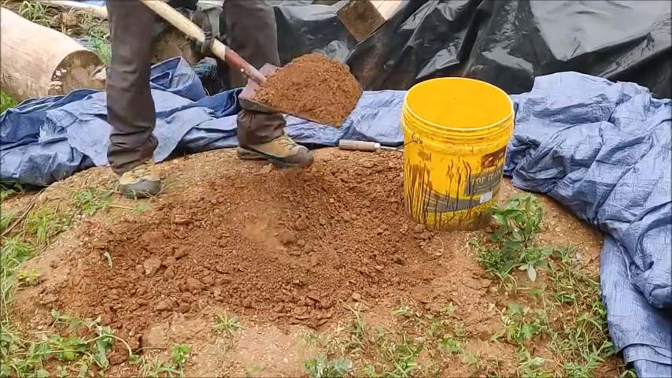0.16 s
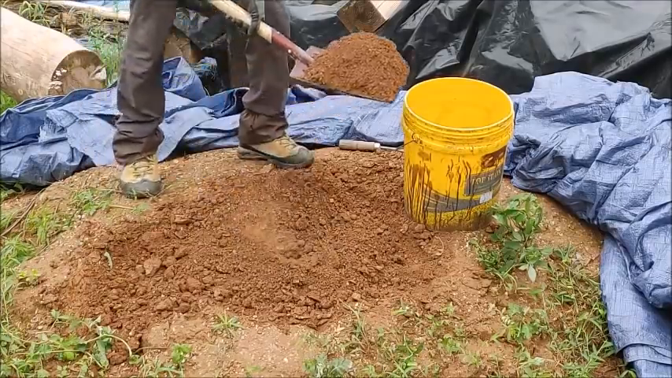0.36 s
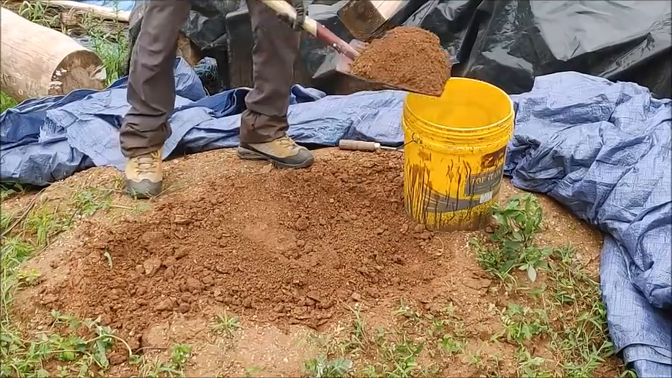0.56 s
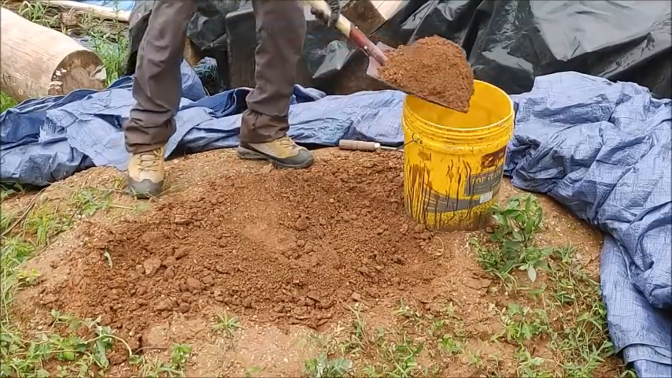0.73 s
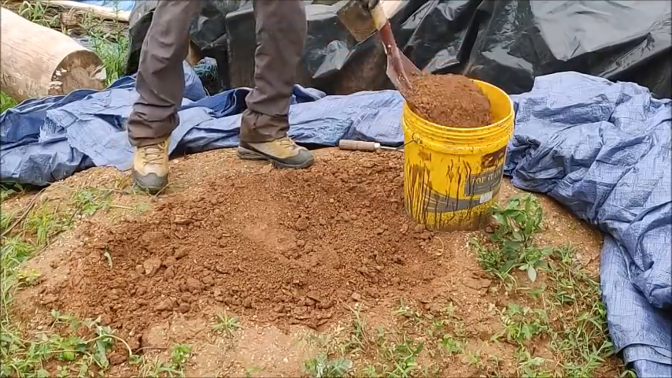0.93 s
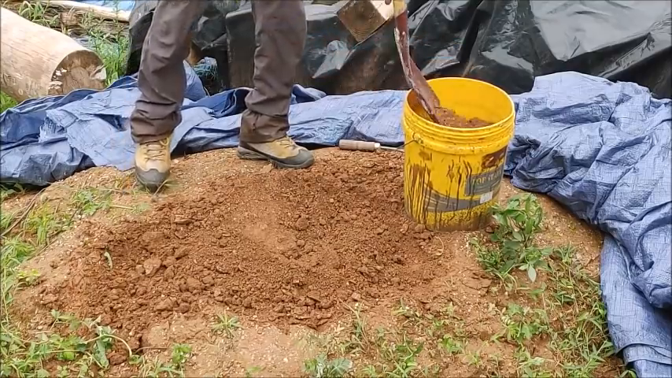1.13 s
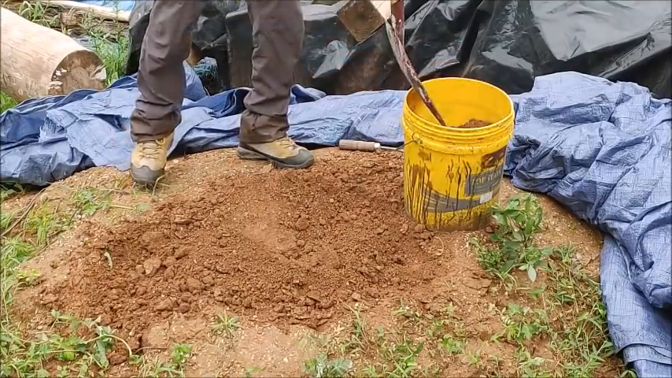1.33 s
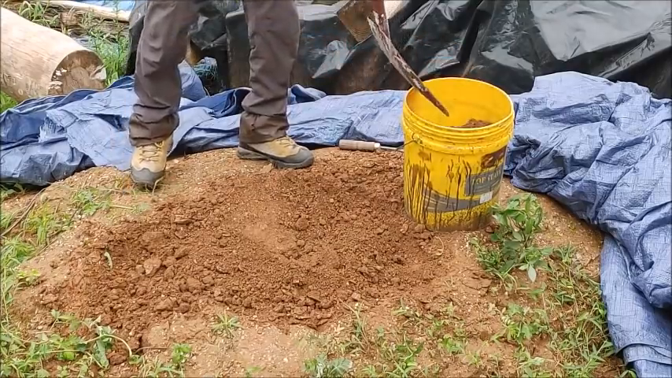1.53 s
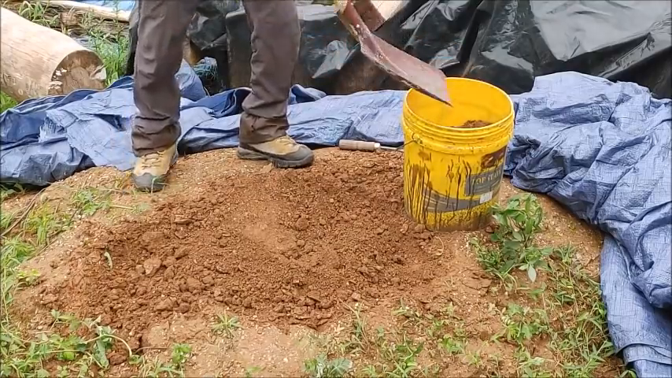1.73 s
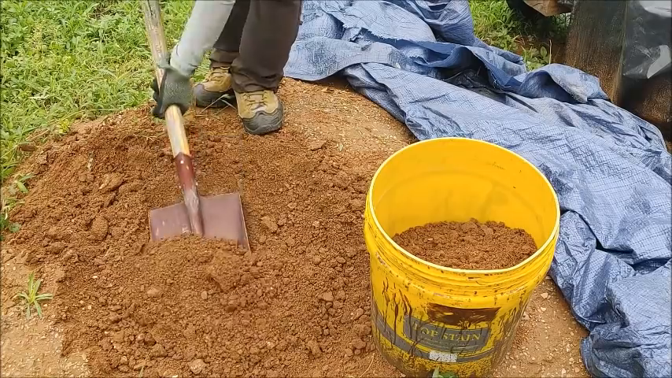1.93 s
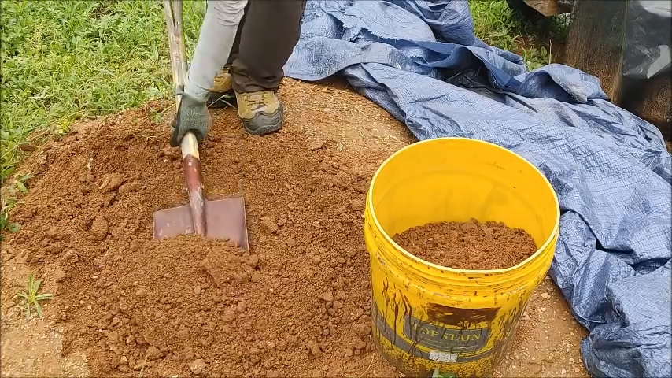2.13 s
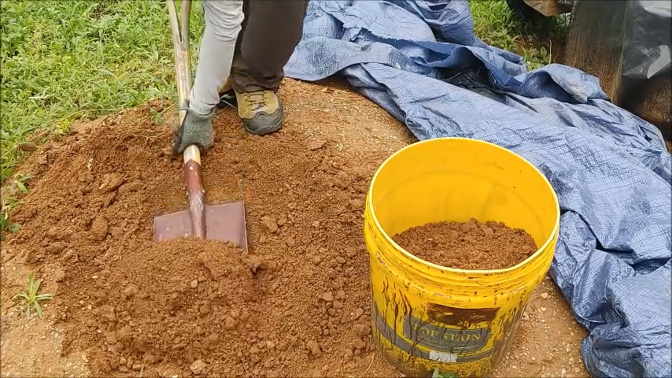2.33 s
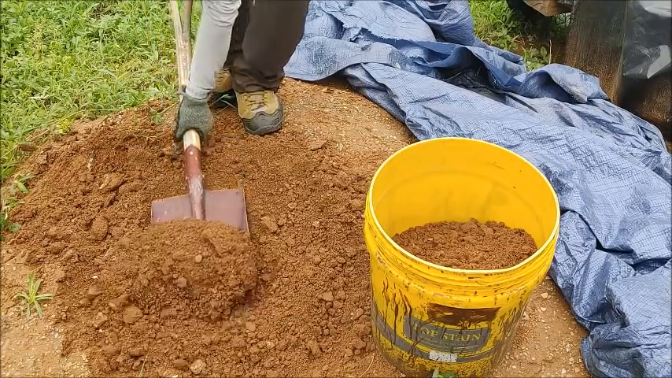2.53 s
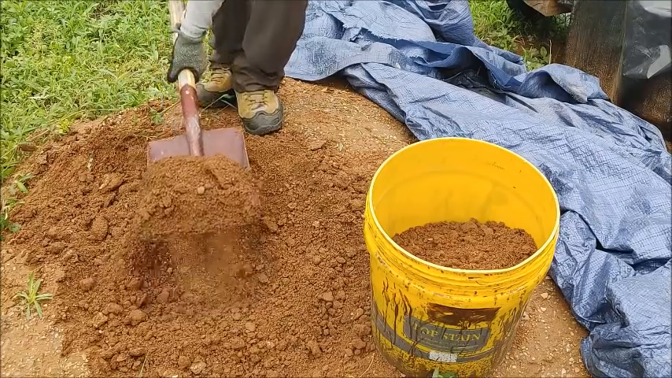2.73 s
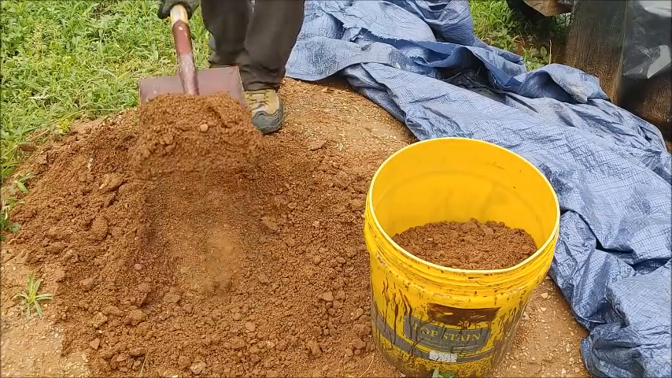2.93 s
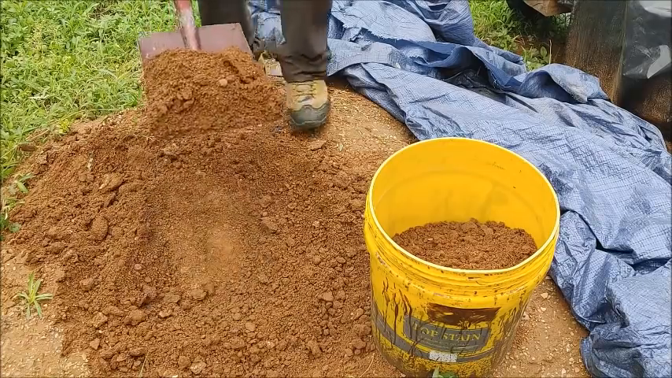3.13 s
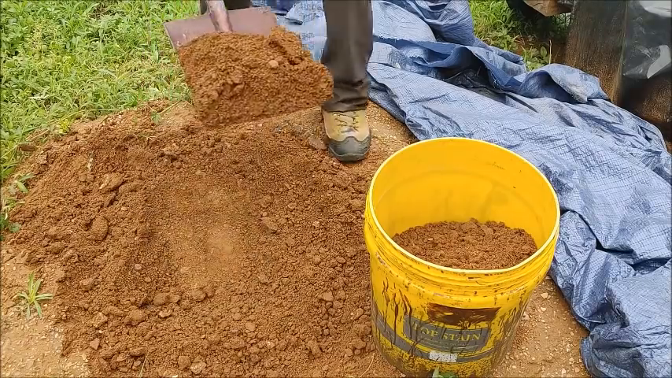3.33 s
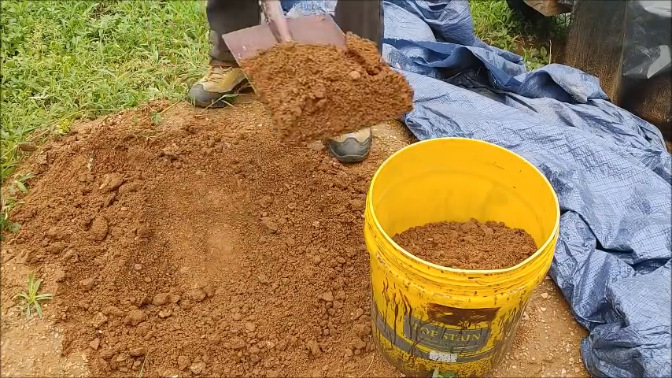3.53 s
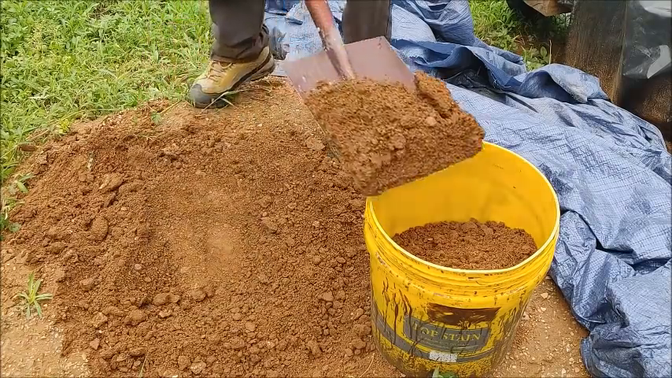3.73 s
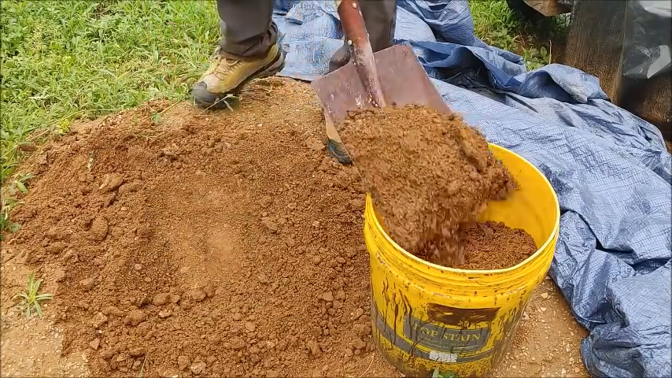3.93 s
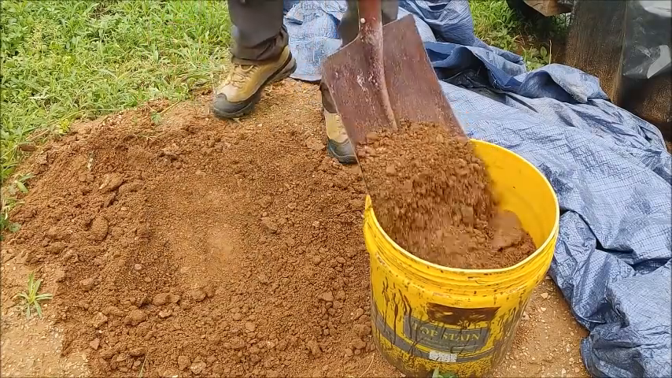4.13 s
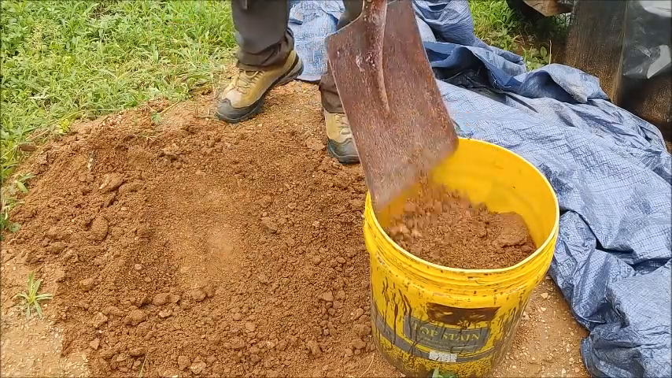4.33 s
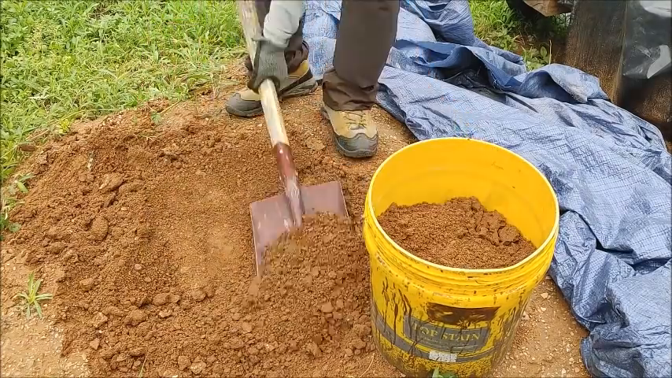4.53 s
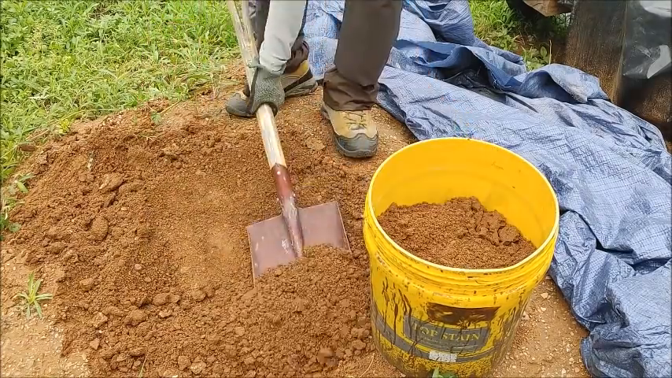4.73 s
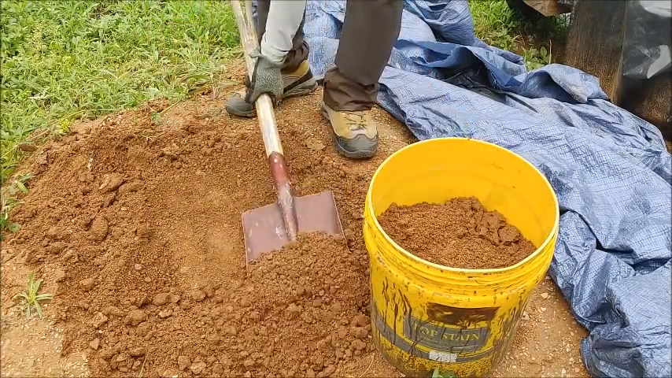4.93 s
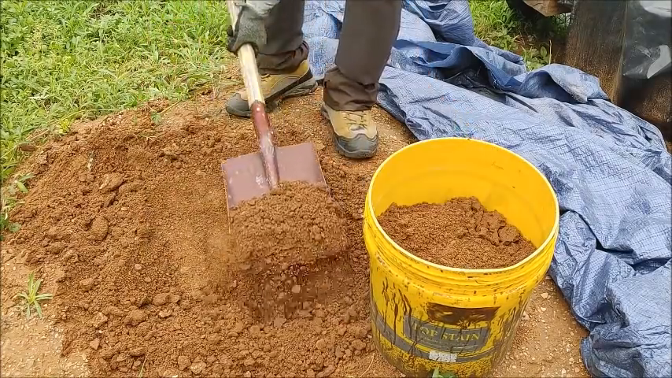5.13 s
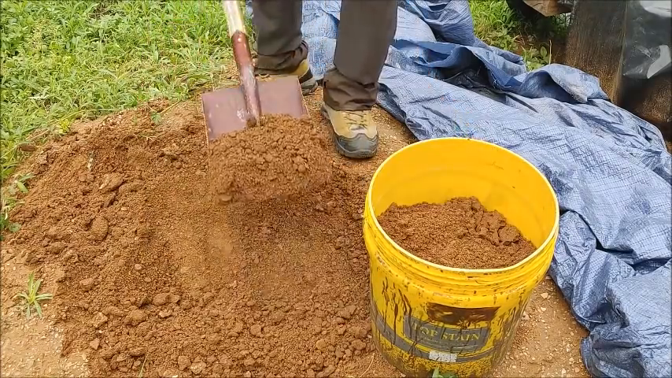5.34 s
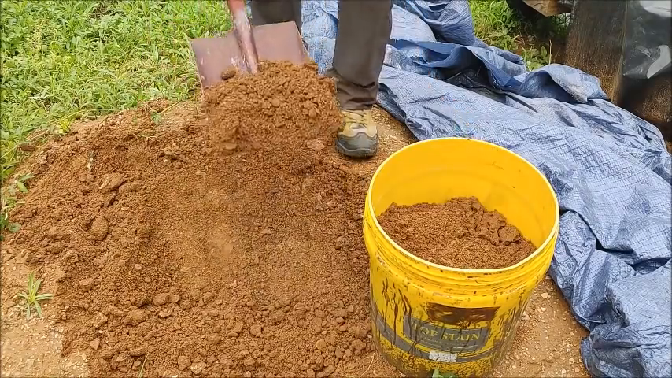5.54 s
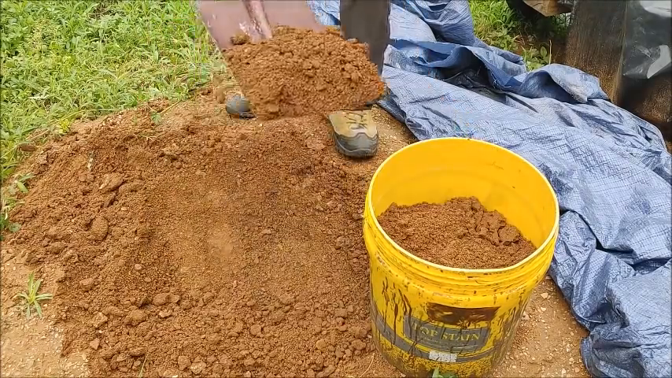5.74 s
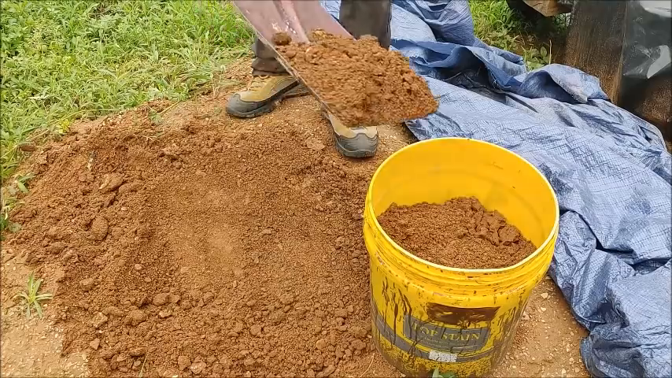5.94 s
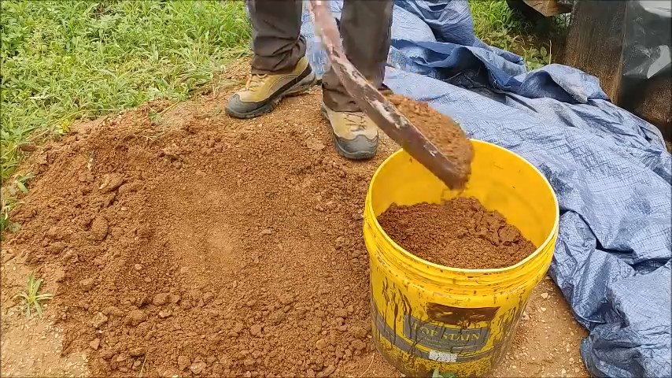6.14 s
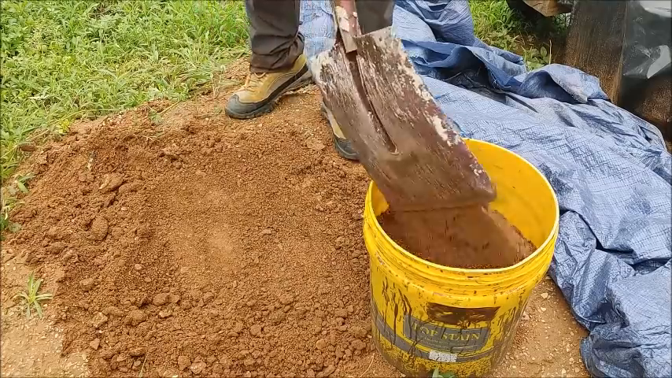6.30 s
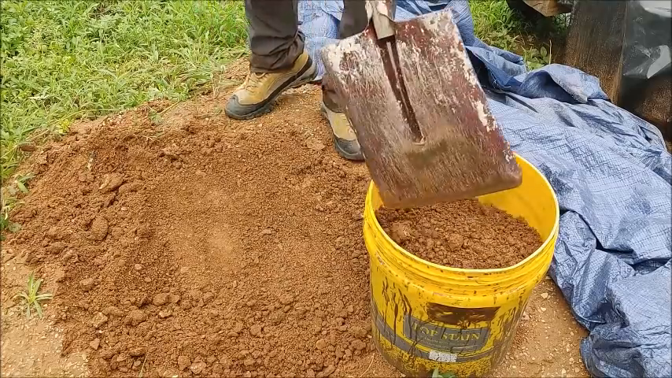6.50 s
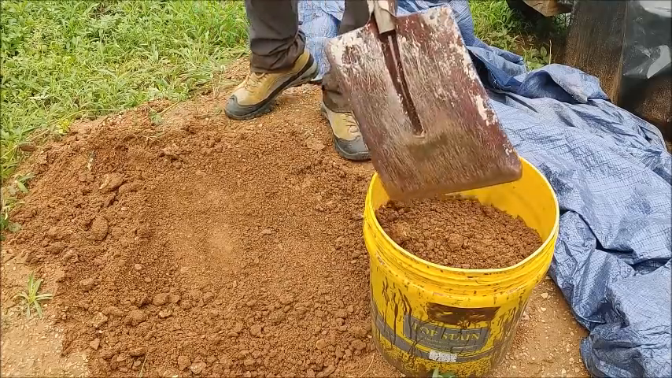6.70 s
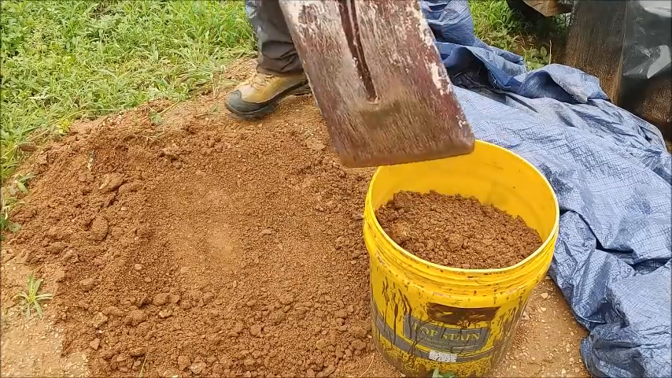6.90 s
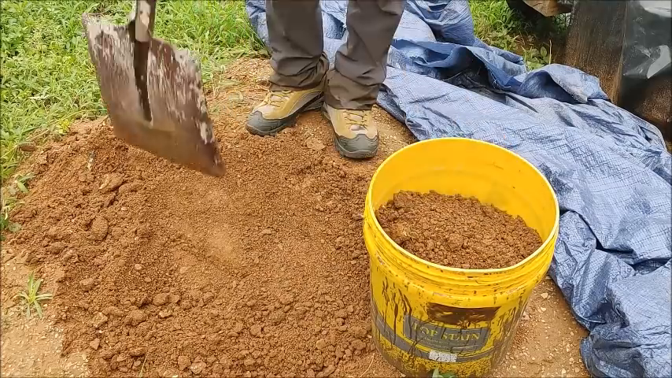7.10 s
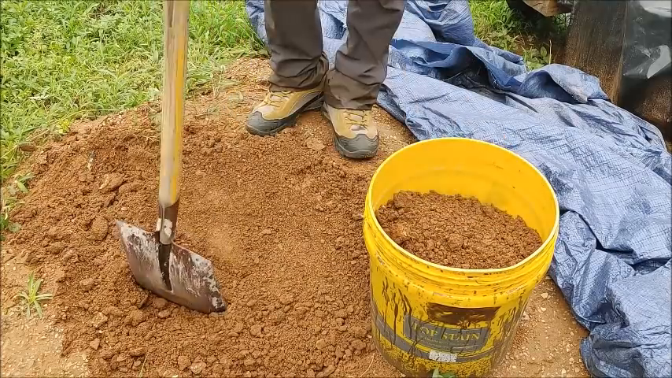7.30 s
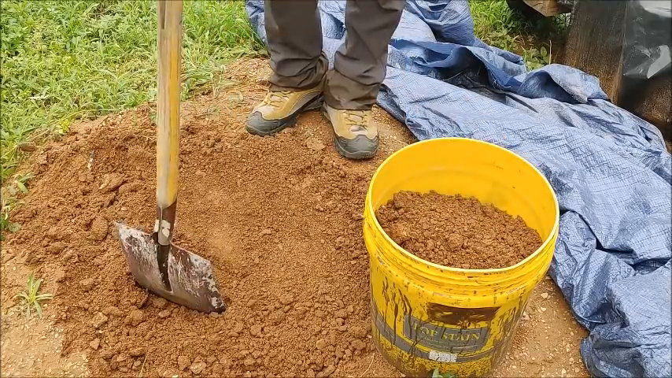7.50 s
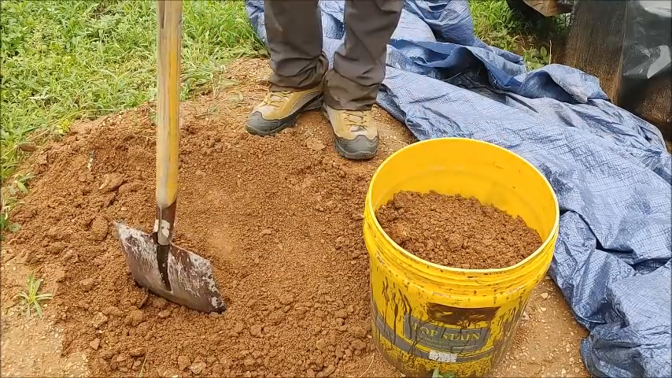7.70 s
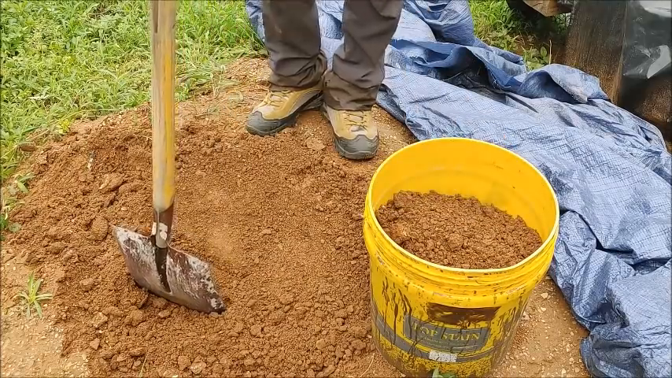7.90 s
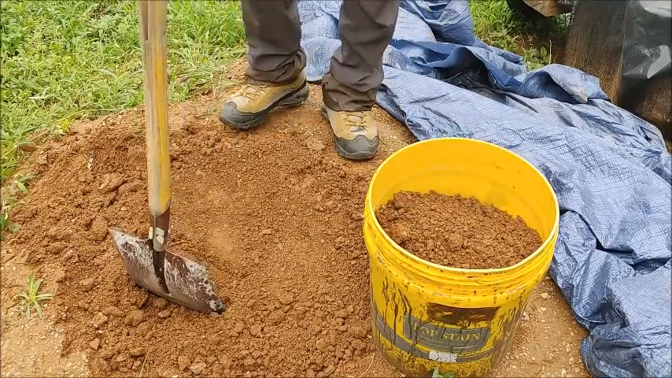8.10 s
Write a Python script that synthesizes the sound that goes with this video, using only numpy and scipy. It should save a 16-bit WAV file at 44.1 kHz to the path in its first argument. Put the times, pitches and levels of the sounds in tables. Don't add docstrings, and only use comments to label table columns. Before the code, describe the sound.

A steel spade bites dry soil and tips gritty loads into a plastic bucket, then stabs the ground; crickets pulse over a thin breezy hiss.

```python
import sys
import numpy as np
from scipy import signal
from scipy.fft import rfft, irfft, dct, next_fast_len
from scipy.io import wavfile
from scipy.ndimage import uniform_filter1d

SR = 44100
rng = np.random.default_rng(int(sys.argv[2]) if len(sys.argv) > 2 else 0)


def convert_level_to_amplitude(level_db):
    exponent = np.asarray(level_db, float) / 20
    return 10 ** exponent


def wrap_up_sound(samples):
    columns = np.atleast_2d(samples).T
    tamed = np.clip(columns, -1, 1)
    steps = np.round(tamed * 32767).astype(np.int16)
    wavfile.write(sys.argv[1], SR, steps)


N = 359856

# (pitch [Hz], pulse rate [1/s], left over right [dB], right port ahead [rad],
# then per scene (start [s], beat offset [beats], level [dB]))
CRICKETS = [(6280, 27.2, 5, 3.1, [(0, -.5, -66), (1.875, -.45, -62), (4.576, .1, -62.5),
            (7.347, .02, -61.5)]), (6690, 26.25, -4.5, 2.0, [(0, .33, -80), (1.875, .53, -63),
            (4.576, .33, -63.5), (7.347, .1, -64)])]
# (frequency [Hz], density [dB per Hz])
AIR_TONE = [(30, -16.5), (65, -44), (120, -24.5), (290, -21), (1150, -22), (1450, -9), (2200, -10),
            (3500, -3.5), (3950, -1), (5400, -12), (6150, 0.5), (6750, -0.5), (7300, -13.5), (8500, -4),
            (11900, -21.5), (12600, -19), (13300, -22.5), (14800, -25), (15700, -22)]
# (frequency [Hz], share [0-1])
AIR_SAME = [(100, 0.88), (1000, 0.043), (1600, 0.018), (3000, 0.048)]
# (time [s], level [dB])
BREEZE = [(0, -3), (.35, -2.5), (.65, 1), (.9, -2.5), (1.6, -1), (2.1, 0.5), (2.9, 1.5), (3.7, 0.5),
          (4.8, -0.5), (5.3, 1), (6.1, 1), (6.9, 0), (7.3, 2), (7.6, 1.5), (7.9, -0.5), (8.16, 1)]
# (frequency [Hz], follow [dB per dB])
BREEZE_SHARE = [(800, -0.45), (2000, 0.24), (4000, 0), (9000, 0.32), (11500, 2.5)]
# (time [s], length [s], start pitch [Hz], end pitch [Hz], level [dB])
BIRDS = [(2.759, 0.17, 1640, 1640, -66.5), (2.86, 0.11, 1750, 2500, -65), (3.087, 0.06, 1047, 1060, -76),
         (.34, .04, 2880, 2870, -67), (.4, .16, 2560, 3000, -70), (.47, .06, 4440, 4430, -66),
         (.72, .1, 4020, 4050, -68), (4.825, 0.17, 2370, 2330, -66), (4.885, .05, 2900, 2920, -66),
         (4.78, .07, 1720, 1780, -69), (5.276, 0.087, 1600, 1710, -66.5), (5.486, 0.11, 1730, 1765, -71.5),
         (5.63, 0.11, 1646, 1680, -71), (5.742, 0.12, 1565, 1555, -70), (3.597, 0.089, 1420, 1440, -70),
         (2.151, 0.17, 1550, 1663, -63.5), (1.334, 0.11, 4860, 4920, -65.5), (1.78, 0.14, 4850, 4690, -64),
         (7.21, 0.14, 4660, 4660, -69), (7.664, 0.16, 4660, 4650, -67), (7.68, .11, 5040, 5040, -70),
         (7.66, .14, 4290, 4270, -70), (7.27, .07, 3860, 3880, -69), (7.699, 0.14, 3900, 3880, -67),
         (7.91, 0.09, 2220, 2240, -74), (8.074, 0.07, 3150, 2980, -81)]

# (time [s], flow [dB], lumpiness [dB])
POURS = [
    [(0.93, -73, 7), (1.0, -50, -12), (1.085, -50.5, 4), (1.166, -55, 10), (1.18, -56.5, 12.5),
     (1.212, -56, 9), (1.264, -54.5, 9), (1.33, -65, 12), (1.42, -75, -5)],
    [(3.99, -64.5, 4), (4.07, -50.5, 13), (4.11, -49.5, 9), (4.166, -58.5, 14.5), (4.25, -50.5, 9),
     (4.33, -44.5, 1.5), (4.42, -56.5, 17), (4.46, -57.5, 17), (4.575, -67.5, 18)],
    [(6.19, -62, -5), (6.246, -50.5, -5), (6.305, -39, -16), (6.39, -49, 2), (6.43, -41.5, -1.5),
     (6.47, -51.5, 9), (6.51, -54, 11.5), (6.56, -58, 5), (6.66, -64, -2)],
]
# (time [s], force [dB], lumpiness [dB])
DIGS = [
    [(1.8748, -35.5, -10), (1.894, -31.5, 10.5), (1.916, -29, -6), (1.955, -32, 5.5), (1.985, -41.5, 9),
     (2.04, -64, -8)],
    [(4.577, -34, 5), (4.585, -35, 8.5), (4.615, -36, 5), (4.737, -53.5, 12.5), (4.79, -74, -8)],
    [(7.349, -33, -1), (7.355, -26.5, -4), (7.370, -22.5, -14), (7.377, -30.5, 9), (7.384, -45, -3),
     (7.392, -43, 20), (7.408, -47, 4), (7.46, -55, -17)],
]
# (frequency [Hz], density [dB per Hz])
POUR_TONE = [(59, -84), (100, -36), (415, -22), (634, -22), (736, -22.5), (1150, -9), (1600, -3.5),
             (2000, -6.5), (2860, -5), (11200, -22), (16000, -33)]
DIG_TONE = [(59, -56.5), (100, -13), (535, 8), (608, 4), (818, 3), (970, 1.5), (1330, 0), (2420, -3),
            (7450, -5), (11400, 0), (16000, -2)]
# (level against the flow [dB], gain with lumpiness [dB per dB])
POUR_LAYERS = [
    (-20, 1.42),
    (-7, 0.5445),
    (-3, 0.53),
    (-1, 0.25),
]
DIG_LAYERS = [
    (-16.5, -0.016),
    (-14, 0.91),
    (-1.5, 0.082),
    (-14.5, -0.75),
]
# (pitch [Hz], width [Hz],
# level [dB])
LOADED_BLADE = [(807, 120, -5), (1270, 8.2, -11), (1550, 8.3, -19), (1790, 21, -31), (2900, 360, -1.5),
                (3430, 570, -8), (4135, 23, 0), (5100, 38, -10)]
EMPTYING_BLADE = [(409, 20, -6), (755, 60, -1), (2450, 79, -10), (2620, 64, -9), (2770, 130, -7),
                  (3080, 13, -6), (3410, 41, -13), (3720, 26, -8), (4060, 22, -9), (3830, 27, -19)]
BURIED_BLADE = [(2610, 24, -3), (2700, 710, 13), (3700, 25, -3), (4220, 36, -16), (6330, 250, 16),
                (8430, 950, 20), (10000, 120, 15), (10000, 370, 14), (10300, 43, -7), (11700, 390, 19)]
# (time [s], pitch [Hz])
HOLLOW = [(1.0, 1750), (1.14, 1800), (1.21, 1430), (1.25, 1900), (1.31, 1500), (4.0, 1550), (4.16, 1690),
          (4.26, 1750), (4.36, 1690), (4.39, 1300), (4.43, 1330), (4.46, 1550), (4.51, 1350), (4.56, 1800),
          (6.25, 1500), (6.32, 1800), (6.4, 1570), (6.44, 1760), (6.5, 1350), (6.56, 1490)]

# (time [s], level [dB], pitch [Hz])
CLACKS = [(1.042, -57, 1600), (1.061, -49, 1800), (1.089, -36.5, 1480), (1.0992, -43, 1700),
          (1.194, -49, 1500), (1.305, -48, 1600), (1.138, -50, 1900), (1.15, -48, 1500), (1.209, -55, 1700),
          (1.2216, -48, 1500), (1.227, -48, 1900), (1.277, -50, 1600), (1.336, -47, 1650),
          (4.1075, -40, 1020), (4.113, -35, 1800), (4.172, -48, 1500), (4.203, -48, 1700),
          (4.224, -40, 1730), (4.2965, -34, 2200), (4.398, -45, 1490), (4.443, -28, 1460),
          (4.674, -40, 1210), (6.2503, -47, 1410), (6.3218, -46, 1800), (6.4305, -50, 2710),
          (6.451, -35, 1450), (6.5443, -41, 1500), (6.5864, -38, 2700), (7.3588, -32.5, 1680),
          (7.3664, -29, 1890), (7.3885, -36, 2200), (7.3962, -46, 1000)]
# (time [s], level [dB], pitch [Hz], t60 [s])
PINGS = [(1.1735, -39, 1520, .015), (1.1744, -41, 4400, .012), (1.045, -50, 2970, .06),
         (1.095, -50, 3000, .08), (1.1735, -44, 2850, .03), (1.25, -43, 3250, 0.066),
         (1.25, -47, 3880, 0.11), (1.252, -45, 2000, 0.066), (1.302, -46, 2700, 0.058),
         (1.307, -41.5, 1475, 0.039), (4.436, -35, 1350, .04), (4.462, -43, 1505, .06),
         (6.49, -43, 1305, 0.046), (6.505, -39, 1292, 0.049), (7.376, -38, 440, 0.035),
         (1.8995, -35, 4080, .05), (1.937, -30, 960, 0.043), (1.94, -32, 2480, 0.043),
         (1.953, -36.5, 670, 0.06), (1.958, -44, 2630, .05), (1.974, -35, 944, 0.042),
         (1.984, -41, 767, 0.034), (4.105, -39, 475, 0.065), (4.106, -40, 704, 0.076),
         (4.108, -42, 995, 0.047), (4.438, -36, 3190, 0.028), (4.505, -43, 1350, 0.055),
         (4.059, -38, 3290, .08), (4.33, -44, 1740, .06), (4.385, -48, 1303, 0.16),
         (6.279, -46.5, 2765, 0.44), (6.302, -45, 2770, .2), (6.346, -45, 2760, .12),
         (6.399, -62, 745, 0.39), (6.399, -56, 406, 0.18), (6.402, -46.5, 4235, 0.18),
         (6.424, -50, 2900, .08), (6.181, -49.5, 1490, 0.069), (6.318, -42.5, 1812, .2),
         (6.354, -49, 3580, .05), (6.352, -49, 1830, 0.14), (6.432, -39, 1810, 0.19),
         (6.485, -42.5, 1812, 0.17), (7.353, -37, 545, 0.16), (7.357, -36.5, 960, 0.055),
         (7.372, -27.5, 418, 0.074), (7.398, -39, 420, 0.065), (7.362, -38, 533, 0.042),
         (7.42, -62, 547, .07)]
# (time [s], peak [dB], pitch [Hz], hardness [dB])
KNOCKS = [(1.064, -39, 2990, -8), (1.095, -42, 2960, -6), (1.175, -45, 2770, -7), (1.193, -48, 1460, -17),
          (1.255, -46, 2040, -20), (1.3055, -42, 1530, -25), (1.8754, -31.5, 2610, 5),
          (1.89, -27.5, 2740, 8), (1.937, -33, 1940, -15), (2.8897, -47.5, 3020, 3), (4.06, -38, 3240, -14),
          (4.106, -31.5, 990, -7), (4.285, -44, 1470, 2), (4.355, -40, 1740, 1), (4.4376, -28, 1440, -22),
          (4.463, -31, 1460, -32), (4.507, -41, 1260, -29), (4.5798, -32, 2570, -4),
          (4.5894, -38, 2580, -4), (6.1735, -40, 2140, -12), (6.2605, -35, 1530, -9),
          (6.315, -42, 2770, -4), (6.402, -34.5, 1550, -18), (6.4295, -38.5, 1780, 9),
          (6.488, -32, 1350, -37), (6.506, -32.5, 1350, -4.5), (6.5303, -37, 1820, -11),
          (6.589, -42.5, 1790, -16), (7.358, -38, 3070, 4), (7.3677, -46, 3100, 10)]
# (time [s], peak [dB], pitch
# [Hz], t60 [s])
THUDS = [(1.078, -53.5, 1020, 0.19), (1.087, -48, 220, 0.047), (1.111, -61, 227, .08),
         (1.1745, -51, 1070, 0.1), (2.398, -74, 470, 0.1), (3.033, -70, 1050, 0.08),
         (3.037, -56.5, 940, 0.16), (3.065, -64, 660, 0.18), (3.095, -65, 1030, 0.26),
         (3.358, -69, 295, 0.14), (3.414, -71, 466, 0.11), (4.1052, -34, 282, 0.068),
         (4.279, -50, 710, 0.14), (4.437, -60, 1120, 0.11), (6.171, -46, 1060, 0.057),
         (6.1803, -40.5, 3160, 0.047), (6.183, -49, 1500, 0.061), (6.399, -75, 750, 0.16),
         (6.399, -66, 403, 0.19), (6.547, -57.5, 497, 0.053), (6.5, -44, 980, 0.067),
         (7.355, -39, 328, 0.041), (7.359, -45, 555, 0.036), (7.365, -34, 540, 0.034),
         (7.374, -36, 420, 0.027), (7.394, -46, 420, 0.044), (7.399, -35, 364, 0.063),
         (7.425, -64, 480, 0.06)]
# (time [s], level [dB], pitch [Hz],
# t60 [s])
STONES = [(1.174, -36, 2800, .012), (1.1742, -42, 8000, .016), (1.8913, -25, 5000, .02),
          (1.8945, -23, 10500, .014), (1.8952, -23, 3200, .012), (3.035, -63, 340, .1),
          (4.1045, -31, 850, .03), (4.1047, -33, 2600, .02), (4.1055, -40, 330, .04), (4.105, -55, 100, .1),
          (1.088, -56, 130, .1), (1.079, -56, 300, .06), (7.358, -63, 80, .12), (4.4368, -32, 1500, .012),
          (4.4642, -36, 1600, .008), (4.5052, -44, 1300, .01), (7.354, -30, 11800, .04),
          (7.3672, -24, 11500, .03), (7.3688, -24, 8400, .025), (7.36, -52, 160, .1)]
# (time [s], level [dB])
RING_STRIKES = [
    (6.302, -62),
    (6.421, -48.5),
]
# (pitch [Hz], level [dB], t60 [s])
FREE_BLADE = [(1669, -8, 1.8), (1813.6, 0, 2.0), (1837.9, -1, 2.0), (2794, -8, .3), (3908, -12, .4)]

# (frequency [Hz], share [0-1])
NEAR_SAME = [(100, .95), (900, .84), (2200, .68), (4500, .45), (9000, .3)]
# (frequency [Hz], left over right [dB])
LEFT_DB = [(200, 2.5), (3000, 1), (6000, 1), (12000, 2.5)]
# (frequency [Hz], level [dB])
MICROPHONE = [(6500, -1.5), (7300, -4.5), (8300, 3.5), (9500, 0.5), (11800, 3), (12900, -5.5), (14600, -4),
              (15600, 1.5)]
# (frequency [Hz], level [dB])
GATE = [(200, -84), (1200, -85), (1500, -65.5), (4000, -48.5), (5300, -63.5), (6300, -61), (7300, -55),
        (8500, -68.5), (10000, -58.5), (11300, -69.5), (12100, -75), (12400, -58.5), (13500, -59),
        (13900, -62.5), (14900, -64), (15300, -60.5)]


def evened(x):
    return x / np.sqrt(np.mean(x ** 2) + 1e-20)


def read(points, hz):
    f, value = np.transpose(points)
    return np.interp(np.log(hz + 1), np.log(f + 1), value)


def add(mix, s, sound):
    part = mix[:, round(s * SR):][:, :sound.shape[-1]]
    part += sound[..., :part.shape[1]]


def crickets():
    t, out = np.arange(N) / SR, np.zeros((2, N))
    for hz, per_s, pan_db, ahead, scenes in CRICKETS:
        start, offset, db = np.transpose(scenes)
        now = np.searchsorted(start, t, "right") - 1
        beat = per_s * t + offset[now] + 1.5
        phase, detune, strength, early = rng.standard_normal((300, 4))[beat.astype(int)].T
        place = beat % 1 - .5 + 0.014 * early
        stroke_shape = np.exp(-(place / .15) ** 2)
        echo_shape = .35 * np.exp(-((place - .3) / .12) ** 2)
        bend = (13 * detune - 30 * place) * place / per_s
        tone = np.sin(2 * np.pi * (hz * t + bend + phase) + [[0], [ahead]])
        pan = convert_level_to_amplitude([[pan_db / 2], [-pan_db / 2]])
        out += convert_level_to_amplitude(db[now] + 0.35 * strength + 10) * (stroke_shape + echo_shape) * tone * pan
    return out


def air():
    hop, size = 256, 1024
    frames, hz = N // hop + 5, np.fft.rfftfreq(size, 1 / SR)
    a, b, c, d, patches, streaks = rng.standard_normal((frames, 513, 6)).T
    patches = evened(uniform_filter1d(uniform_filter1d(patches, 14, 0), 22, 1))
    streaks = evened(uniform_filter1d(uniform_filter1d(streaks, 2, 0), 16, 1))
    streaky = ((hz > 1300) & (hz < 5600))[:, None]
    breeze_db = np.interp(np.arange(frames) * hop / SR, *np.transpose(BREEZE))

    same = np.clip(read(AIR_SAME, hz), 0, 1)[:, None]
    left = a + 1j * b
    right = same * left + np.sqrt(1 - same ** 2) * (c + 1j * d)
    level_db = read(AIR_TONE, hz)[:, None] + np.outer(read(BREEZE_SHARE, hz), breeze_db)
    level_db = level_db + 1.15 * patches + (1.2 + 1.7 * streaky) * streaks
    z = np.array([left, right]) * convert_level_to_amplitude(level_db)

    first_cut_s, chorus_hz, chorus_width_hz, chorus_db = 1.875, 6600, 500, -3
    chorus = chorus_db * np.exp(-((hz - chorus_hz) / chorus_width_hz) ** 2)
    z[..., :round(first_cut_s * SR / hop)] *= convert_level_to_amplitude(chorus)[:, None]
    return convert_level_to_amplitude(-70) * signal.istft(z, nperseg=size, noverlap=size - hop)[1][:, :N]


def birds():
    out = np.zeros((2, N))
    for s, length, start_hz, end_hz, db in BIRDS:
        count = round(length * SR)
        glide = np.linspace(start_hz, end_hz, count)
        glide += 13 * evened(uniform_filter1d(rng.standard_normal(count), 700))
        waver = convert_level_to_amplitude(4 * evened(uniform_filter1d(rng.standard_normal((2, count)), 500)))
        whistle = np.sin(2 * np.pi * np.cumsum(glide) / SR) * signal.windows.tukey(count, .5)
        add(out, s, convert_level_to_amplitude(db + 5.5) * waver * whistle)
    return out


def resonate(x, hz, width):
    r = np.exp(-np.pi * width / SR)
    return 2 * signal.lfilter([1 - r], [1, -r * np.exp(2j * np.pi * hz / SR)], x).real


def sliding(x, hz, width):
    turn = np.exp(2j * np.pi * np.cumsum(hz) / SR)
    r = np.exp(-np.pi * width / SR)
    return 2 * (turn * signal.lfilter([1 - r], [1, -r], x / turn)).real


def grit(count, per_s, spread_db):
    size = convert_level_to_amplitude(spread_db * np.minimum(rng.exponential(1, count), 4))
    size = size * (rng.random(count) < per_s / SR)
    lumps = signal.lfilter([1], [1, -np.exp(-1 / (0.0005 * SR))], size ** 2)
    return evened(np.sqrt(lumps + 0.5 * lumps.mean()) * rng.standard_normal((3, count)))


def stroke(rows, shares, tone, blade, blade_db, per_s, spread_db, clump_db, hollow_db=-60):
    s, flow_db, lumps_db = np.transpose(rows)
    t = np.arange(s[0], s[-1], 1 / SR)
    grains = grit(len(t), per_s, spread_db)
    ringing = sum(convert_level_to_amplitude(db) * evened(resonate(grains, hz, width)) for hz, width, db in blade)
    grains += convert_level_to_amplitude(blade_db) * evened(ringing)

    hz = np.fft.rfftfreq(len(t), 1 / SR)
    z = rfft(grains) * convert_level_to_amplitude(read(tone, hz))
    slopes = [1 / (1 + (hz / edge) ** 6) for edge in (900, 2300, 6500)]
    below = [0 * hz] + slopes + [1 + 0 * hz]
    layers = [evened(irfft(z * np.sqrt(abs(part)), len(t))) for part in np.diff(below, axis=0)]
    hollow = sliding(layers[1], np.interp(t, *np.transpose(HOLLOW)), width=230)
    layers[1] = evened(layers[1] + convert_level_to_amplitude(hollow_db) * evened(hollow))

    clumps = uniform_filter1d(rng.standard_normal((len(layers), len(t))), round(.012 * SR), axis=1)
    layers = [layer * convert_level_to_amplitude(clump_db * evened(clump)) for layer, clump in zip(layers, clumps)]

    fade = np.clip(np.minimum((t - s[0]) / .001, (s[-1] - t) / .03), 0, 1)
    flow_db, lumps_db = np.interp(t, s, flow_db), np.interp(t, s, lumps_db)
    mixed = sum(convert_level_to_amplitude(flow_db + db + share * lumps_db) * layer
                for (db, share), layer in zip(shares, layers))
    return s[0], fade * mixed


def pebbles(rows):
    per_s, level_db, spread_db, per_lumps, cycles = 700, -8.5, 1.5, 0.68, 2.7
    s, flow_db, lumps_db = np.transpose(rows)
    t, ring = np.arange(s[0], s[-1], 1 / SR), np.arange(600) / SR
    chance, size, kind = rng.random((len(t), 3)).T
    hits = (chance < per_s / SR) * convert_level_to_amplitude(-spread_db * np.log(size + .03))
    pitches = np.geomspace(1350, 4750, 14)
    kind = (kind * len(pitches)).astype(int)
    stones = np.zeros(len(t))
    for k, hz in enumerate(pitches):
        one = ring * hz * np.sin(2 * np.pi * hz * ring) * np.exp(-ring * hz / cycles)
        stones += signal.oaconvolve(hits * (kind == k), one)[:len(t)]
    level = convert_level_to_amplitude(np.interp(t, s, flow_db + per_lumps * lumps_db) + level_db)
    return s[0], level * evened(stones) * np.ones((3, 1))


def pours(out):
    blades = (LOADED_BLADE, LOADED_BLADE, EMPTYING_BLADE)
    for rows, blade, ring_db in zip(POURS, blades, (-12, -12, -6)):
        add(out, *stroke(rows, POUR_LAYERS, POUR_TONE, blade, ring_db,
                         per_s=2200, spread_db=3.6, clump_db=2.2, hollow_db=3))
        add(out, *pebbles(rows))


def blow(db, hz, t60, sharp, push=.6):
    count = 4000
    decay = convert_level_to_amplitude(-60 * np.arange(count) / SR / max(t60, .005))
    drive = decay * rng.standard_normal((3, count))
    drive[:, 0] += push * np.linalg.norm(decay)
    burst = resonate(resonate(drive, hz, hz / sharp), hz, hz / sharp)
    return convert_level_to_amplitude(db) * burst * np.sqrt((decay ** 2).sum() / (burst ** 2).sum(1, keepdims=True))


def clacks(out):
    for s, db, hz in CLACKS:
        add(out, s, blow(db, hz, .009, sharp=2, push=1.6))


def ping(db, hz, t60):
    t = np.arange(0, t60, 1 / SR)
    level = convert_level_to_amplitude(db - 60 * t / t60) * np.minimum(t / .0021, 1)
    return level * np.sin(2 * np.pi * hz * t) * np.ones((3, 1))


def pings(out):
    for s, db, hz, t60 in PINGS:
        add(out, s, ping(db, hz, t60))


def knocks(out):
    t60 = .026
    for s, db, hz, hard_db in KNOCKS:
        tick_db = -2.5 + 0.12 * hard_db
        add(out, s + 0.00031, blow(db - 4, hz, t60, sharp=3.5, push=1.3))
        tick = blow(db + tick_db - 0.5, 3650, 0.41 * t60, sharp=9.5)
        crack = blow(db + hard_db - 6.5, 9900, 1.6 * t60, sharp=1.9)
        add(out, s + 0.00026, tick + crack)


def thuds(out):
    for s, db, hz, t60 in THUDS:
        add(out, s - .0011, blow(db, hz, t60, sharp=2.06, push=0.46))


def stones(out):
    for s, db, hz, t60 in STONES:
        add(out, s, blow(db, hz, t60, sharp=1.1, push=.25 if hz > 4000 else 1.0))


def digs(out):
    for rows in DIGS:
        add(out, *stroke(rows, DIG_LAYERS, DIG_TONE, BURIED_BLADE, -8,
                         per_s=4000, spread_db=2.4, clump_db=1.4))


def spade():
    out = np.zeros((3, N))
    for source in (pours, clacks, pings, knocks, thuds, stones, digs):
        source(out)
    return out


def ports(rows):
    size = next_fast_len(N)
    hz, z = np.fft.rfftfreq(size, 1 / SR), rfft(rows, size)
    same = np.clip(read(NEAR_SAME, hz), 0, 1)
    tilt = convert_level_to_amplitude(read(LEFT_DB, hz) / 2)
    pair = np.sqrt(same) * z[0] + np.sqrt(1 - same) * z[1:]
    pair = pair * [tilt, 1 / tilt] * convert_level_to_amplitude(read(MICROPHONE, hz))
    bass_cut = signal.butter(2, 130, "high", fs=SR, output="sos")
    return signal.sosfilt(bass_cut, irfft(pair, size)[:, :N])


def blade_ring():
    out, t = np.zeros((1, N)), np.arange(SR) / SR
    for s, strike_db in RING_STRIKES:
        for hz, db, t60 in FREE_BLADE:
            add(out, s, convert_level_to_amplitude(strike_db + db - 60 * t / t60) * np.sin(2 * np.pi * hz * t))
    hand = np.clip((6.93 - np.arange(N) / SR) / .06, 0, 1)
    return out * hand * convert_level_to_amplitude([[-1], [-1]])


def scene():
    around = crickets() + air() * convert_level_to_amplitude([[.3], [-.3]]) + birds()
    return around + ports(spade()) + blade_ring()


def thin(x):
    start, size, edge_hz = 58, 1024, 15760
    count, hz = N // size + 3, (np.arange(size) + .5) * SR / (2 * size)
    window = signal.windows.kaiser_bessel_derived(2 * size, 4 * np.pi)
    padded = np.pad(x, ((0, 0), (size - start, (count + 1) * size)))
    places = np.arange(2 * size) + size * np.arange(count)[:, None]
    a, b, c, d = np.split(window * padded[:, places], 4, axis=2)
    folded = np.concatenate([-c[..., ::-1] - d, a - b[..., ::-1]], axis=2)
    z = dct(folded, type=4, norm="ortho")

    power = (z ** 2).mean(0)
    loud_db = 10 * np.log10(power.mean(1) + 1e-12)
    swell_db = 0.36 * np.clip(loud_db - np.median(loud_db), 0, 14)
    whim = evened(uniform_filter1d(rng.standard_normal((count, size // 32)), 3, 0))
    whim_db = np.where(hz > 10000, 4, 1.7) * np.repeat(whim, 32, axis=1)
    limit = convert_level_to_amplitude(read(GATE, hz) + swell_db[:, None] + whim_db) * np.where(hz < edge_hz, 1, convert_level_to_amplitude(40))
    kept = z * (power > limit ** 2)

    tail, head = np.split(dct(kept, type=4, norm="ortho"), 2, axis=2)
    rising = window[:size] * np.concatenate([head, -head[..., ::-1]], axis=2)
    falling = window[size:] * np.concatenate([tail[..., ::-1], tail], axis=2)
    out = np.zeros_like(padded)
    out[:, :count * size] += rising.reshape(2, -1)
    out[:, size:(count + 1) * size] -= falling.reshape(2, -1)
    return out[:, size - start:][:, :N]


def band_limit(x):
    return signal.sosfilt(signal.butter(12, 16620, fs=SR, output="sos"), x)


def record(dry):
    lag = 178
    late = np.concatenate([dry[1, :lag][::-1], dry[1, :-lag]])
    mix = thin(np.array([dry[0], late]))
    return band_limit(mix)


dry = scene()
out = record(dry)
wrap_up_sound(out)
```